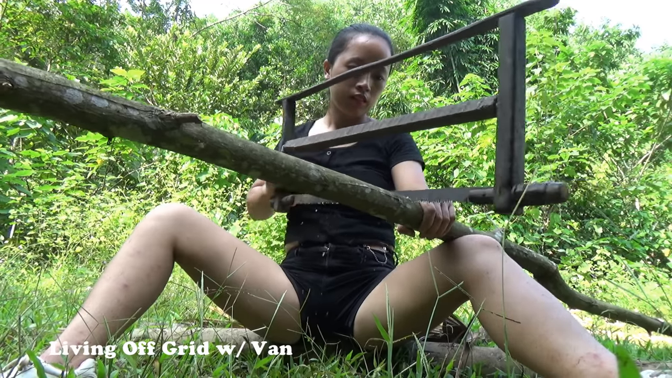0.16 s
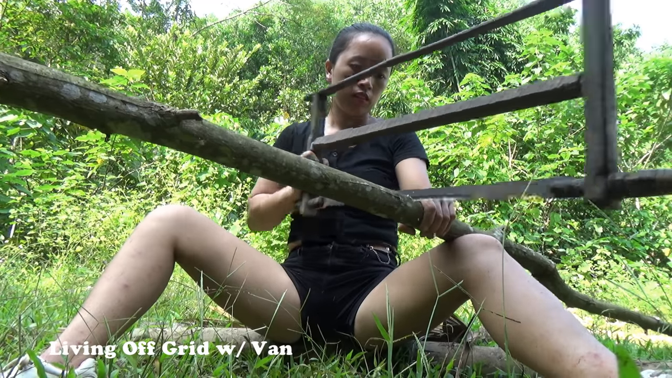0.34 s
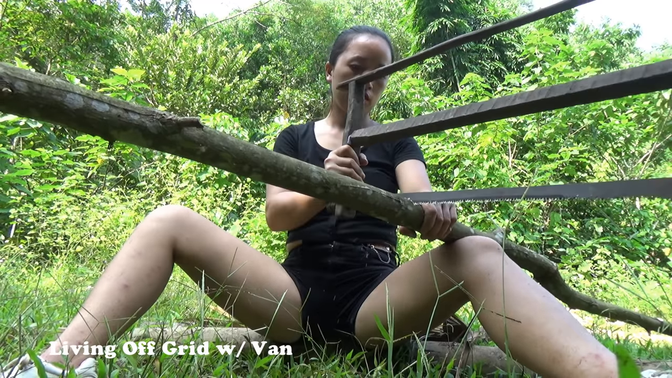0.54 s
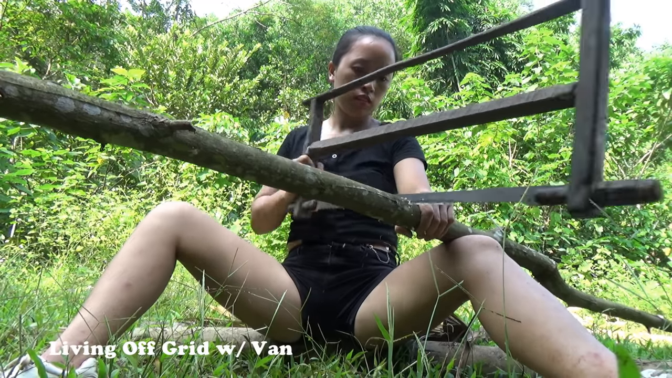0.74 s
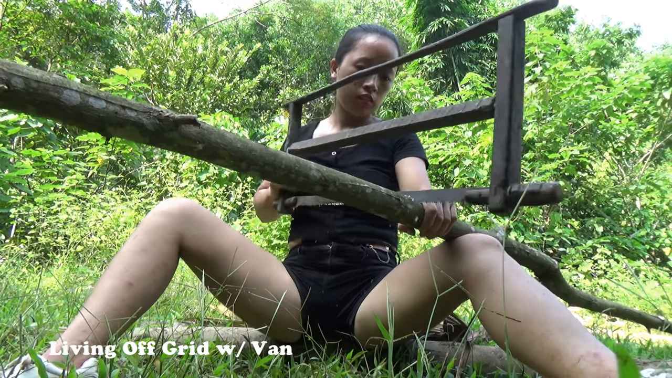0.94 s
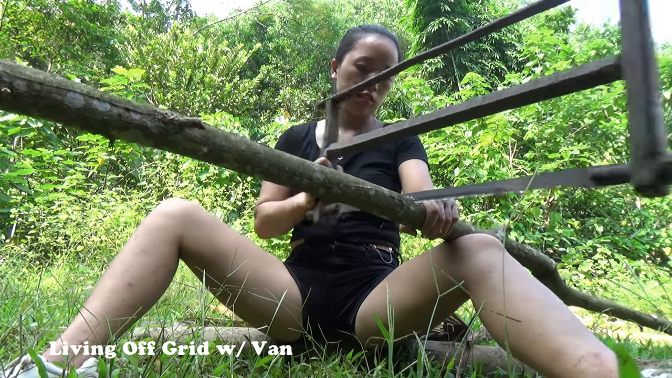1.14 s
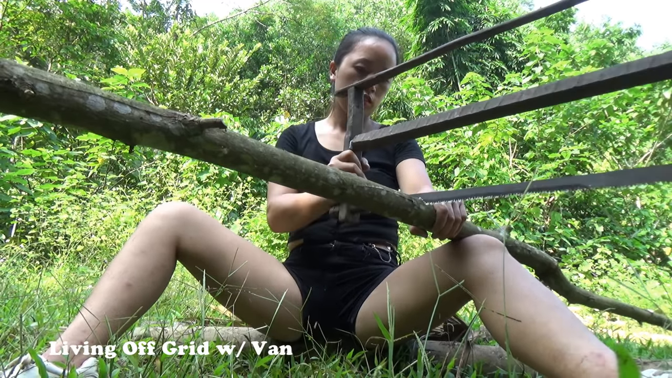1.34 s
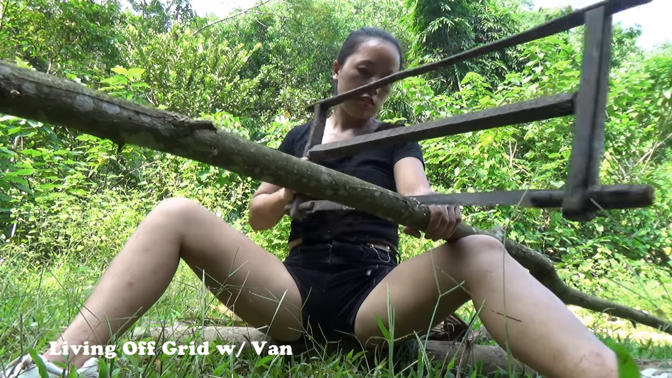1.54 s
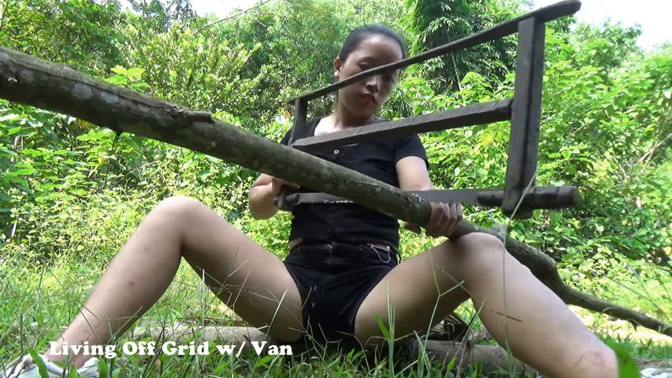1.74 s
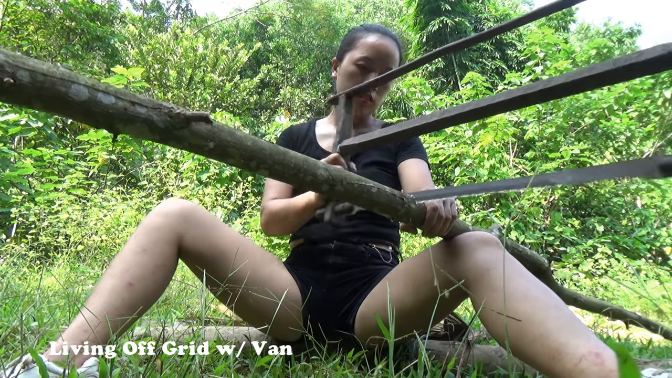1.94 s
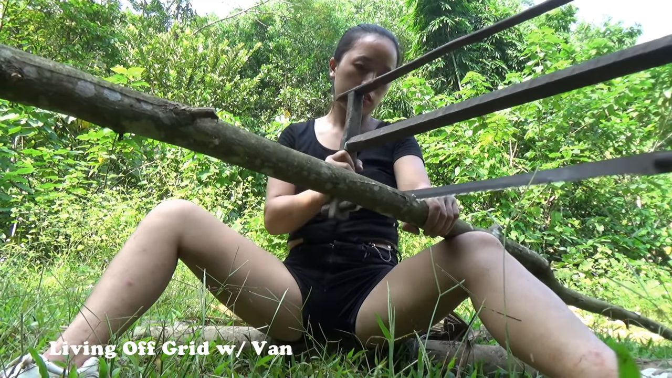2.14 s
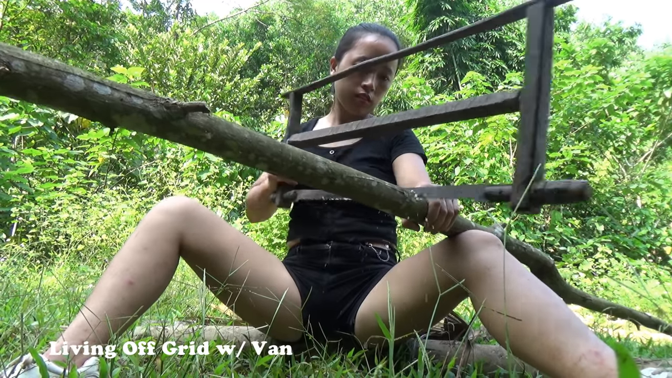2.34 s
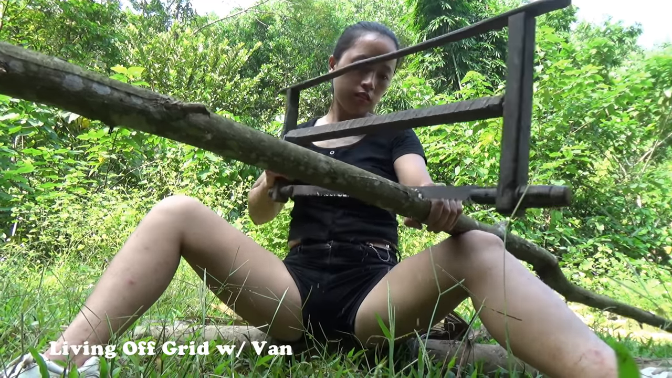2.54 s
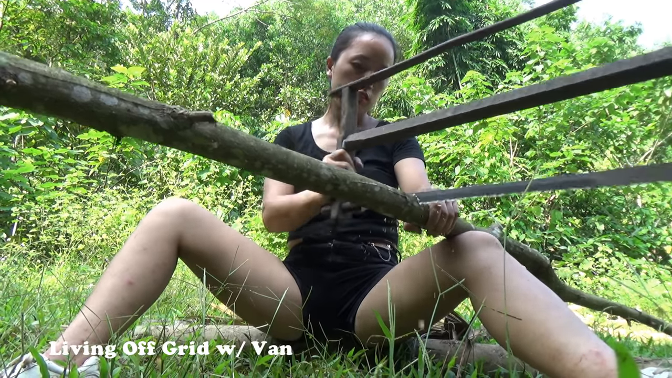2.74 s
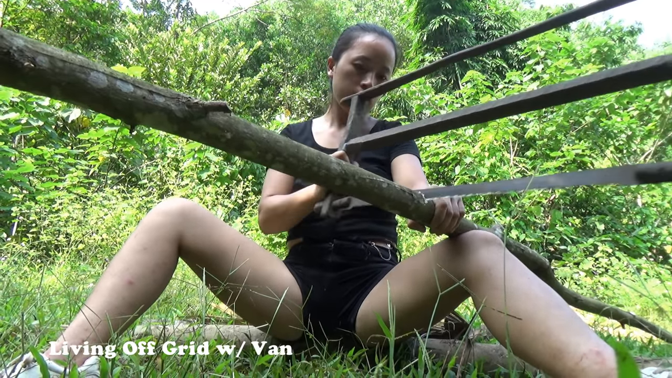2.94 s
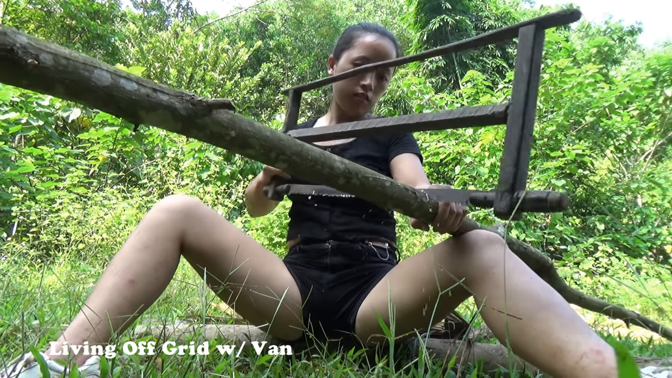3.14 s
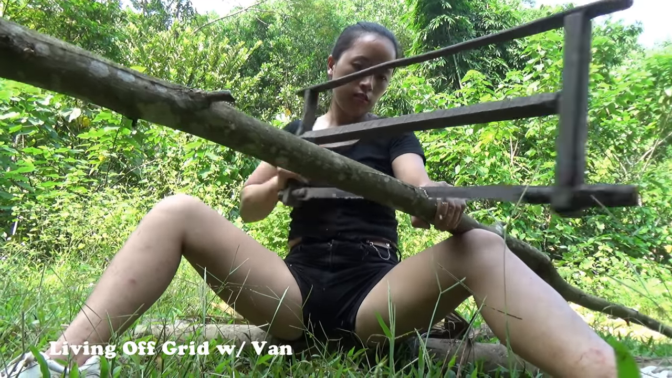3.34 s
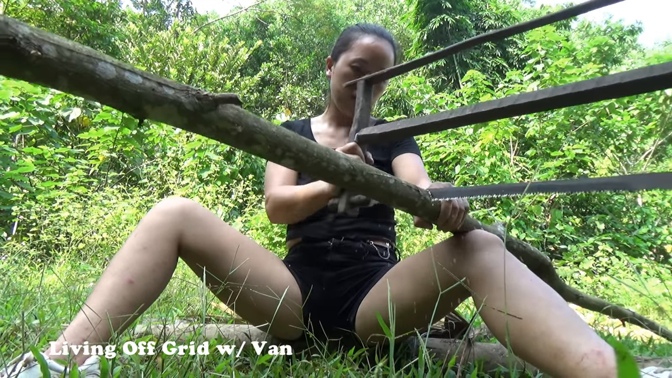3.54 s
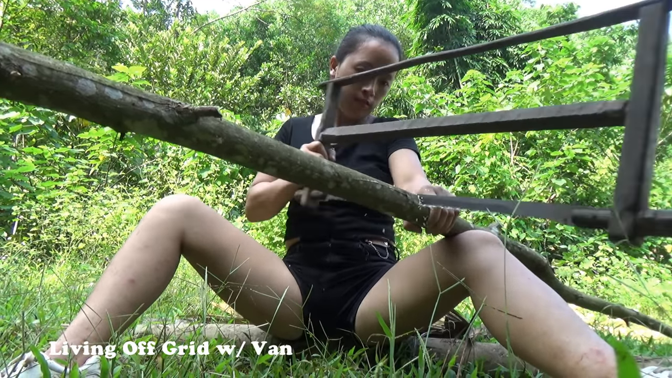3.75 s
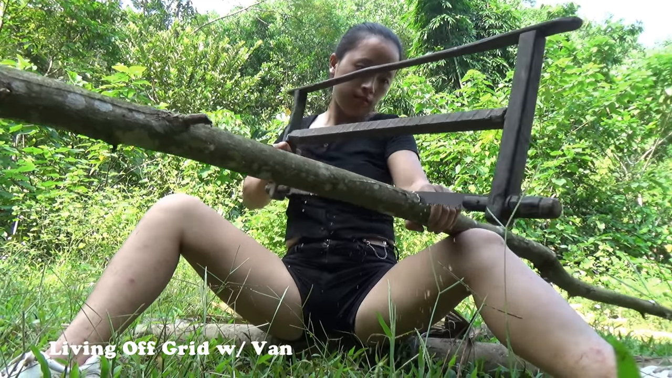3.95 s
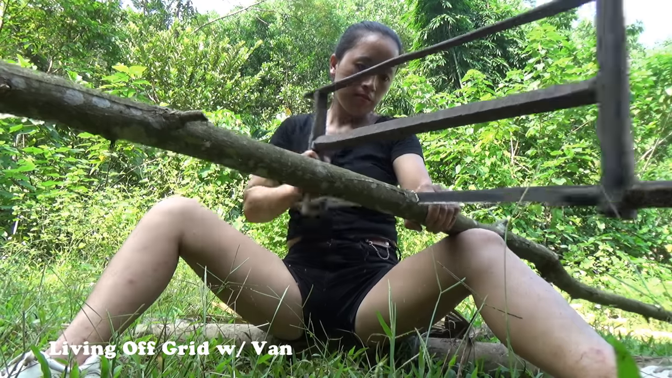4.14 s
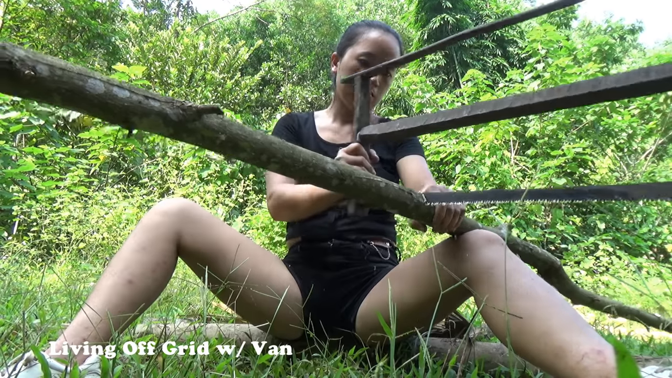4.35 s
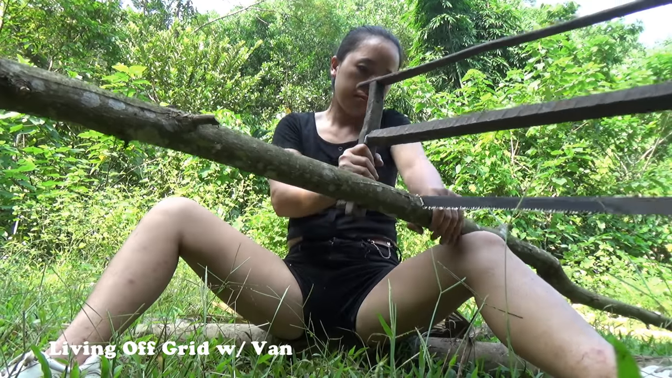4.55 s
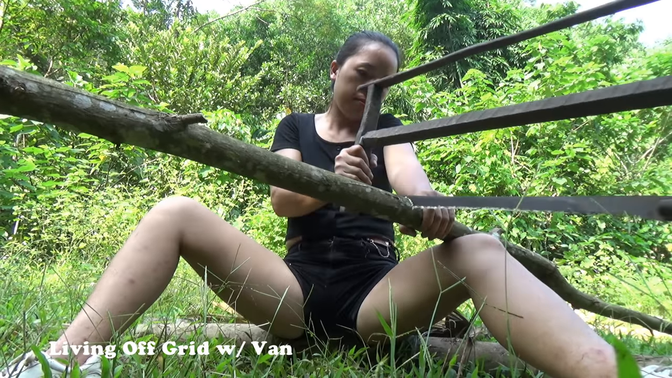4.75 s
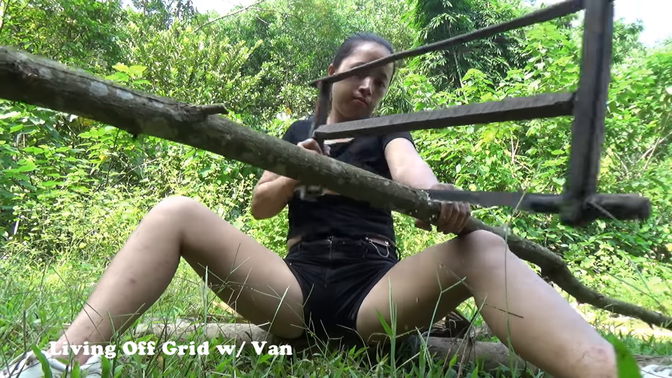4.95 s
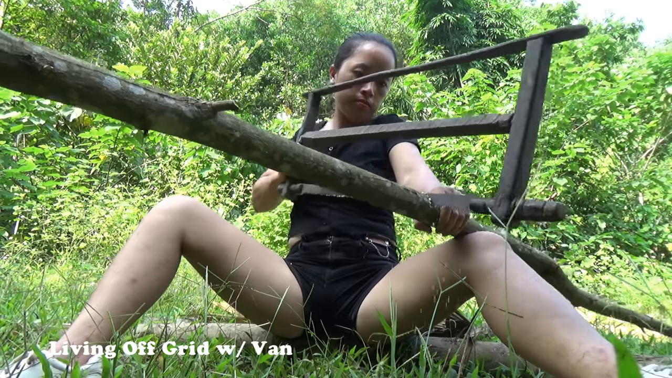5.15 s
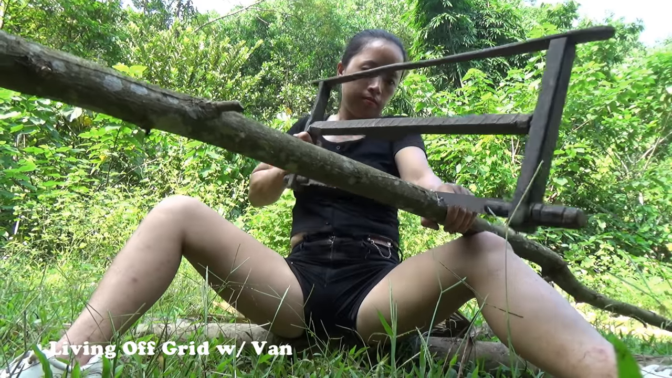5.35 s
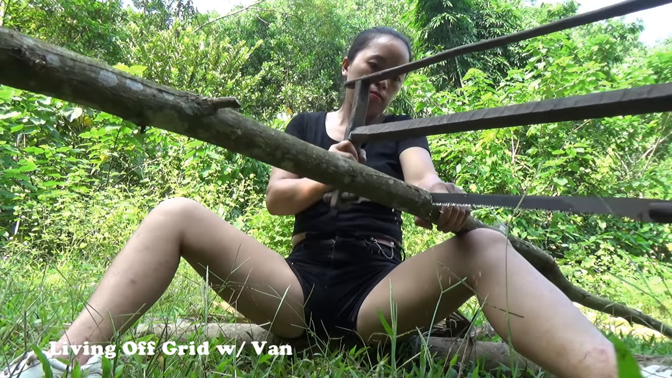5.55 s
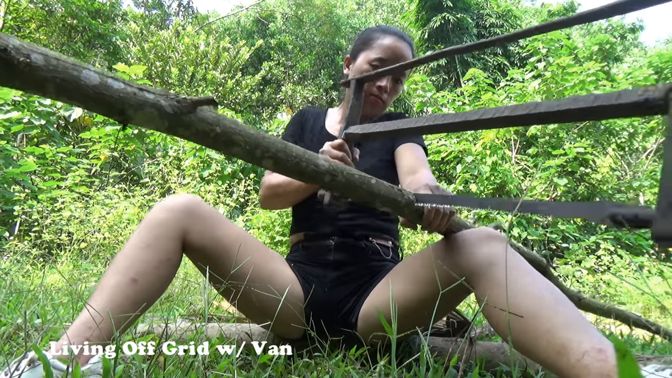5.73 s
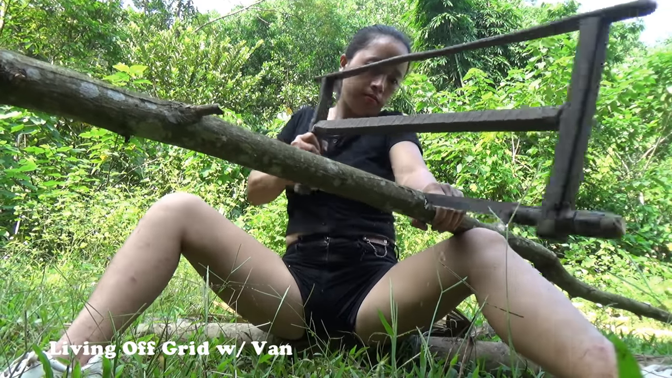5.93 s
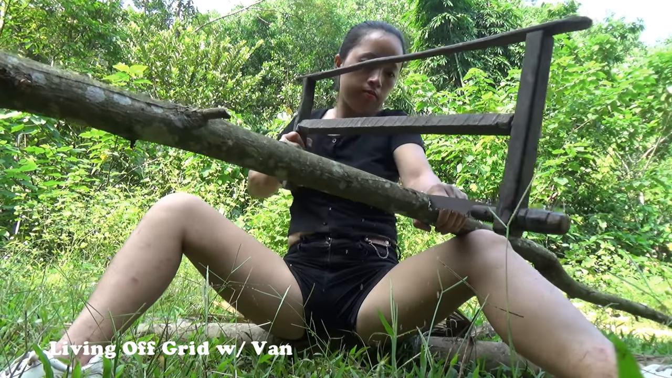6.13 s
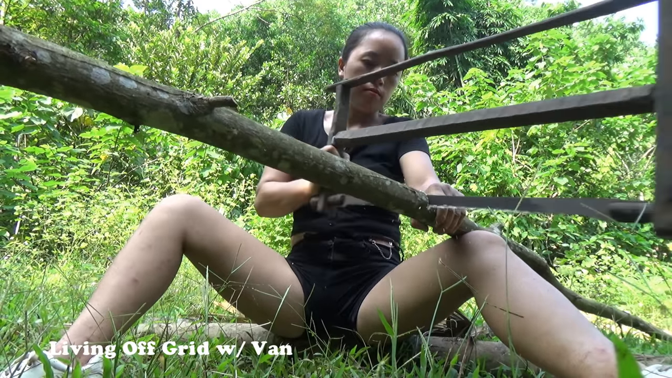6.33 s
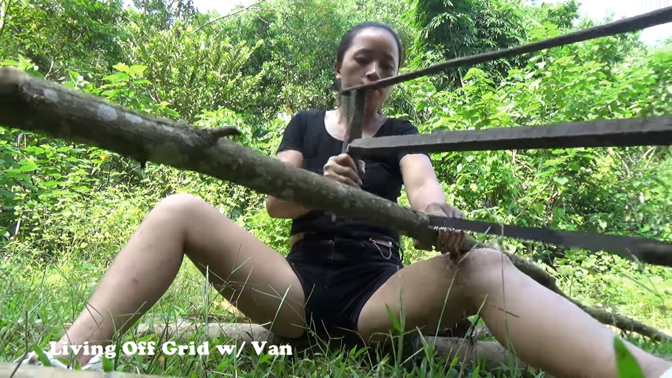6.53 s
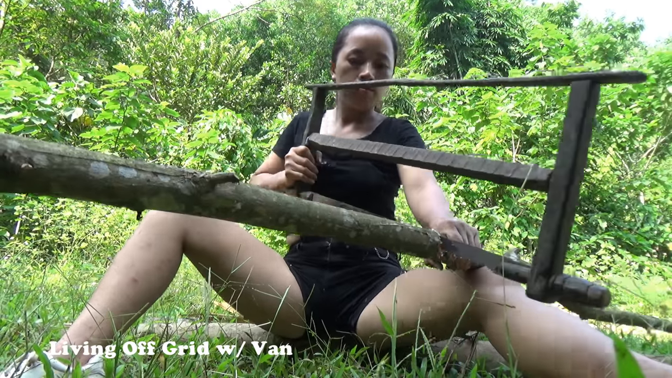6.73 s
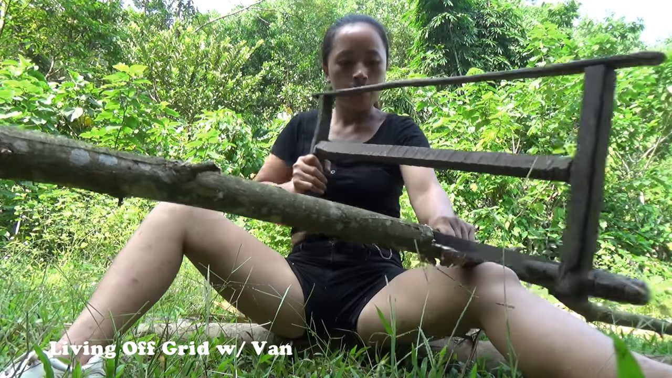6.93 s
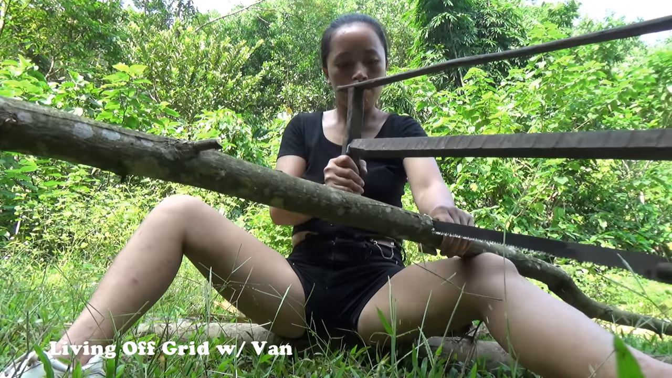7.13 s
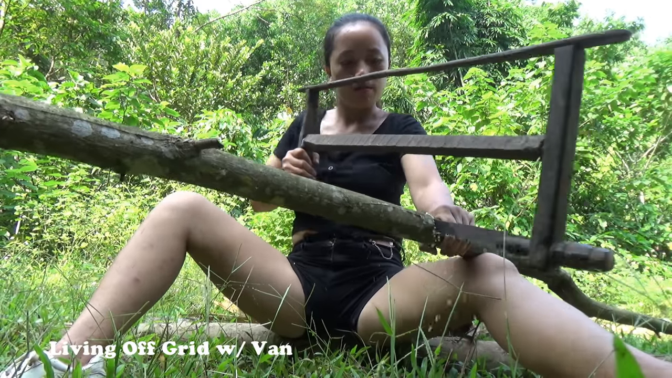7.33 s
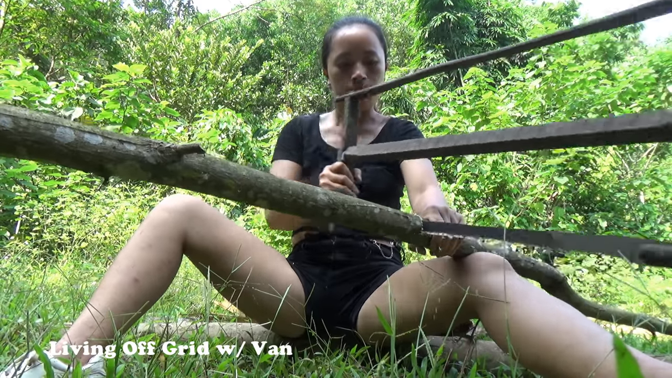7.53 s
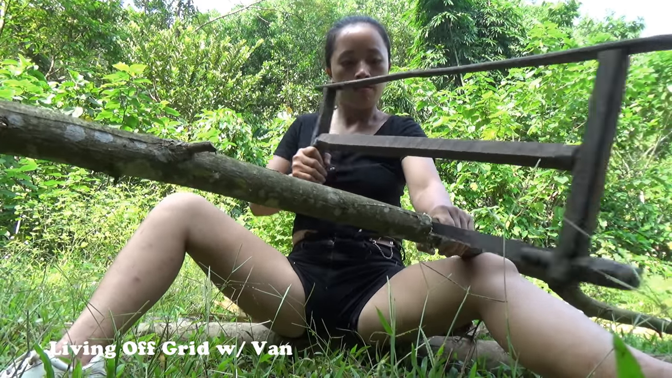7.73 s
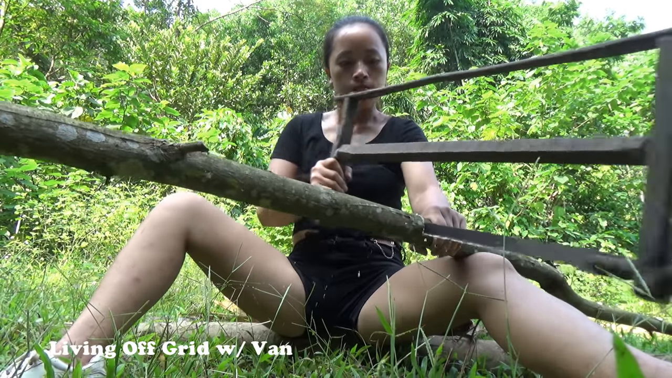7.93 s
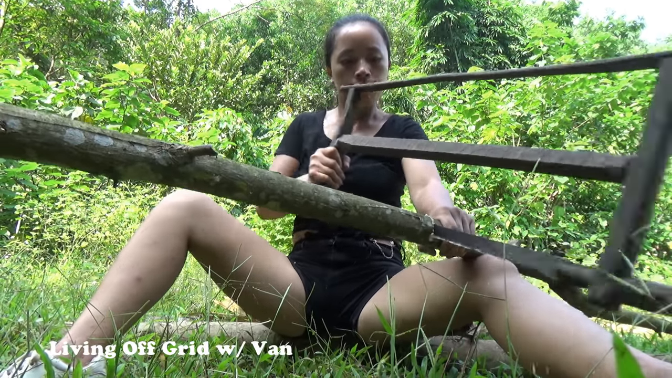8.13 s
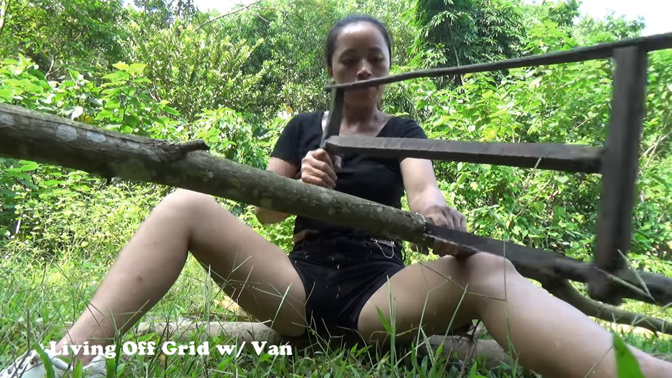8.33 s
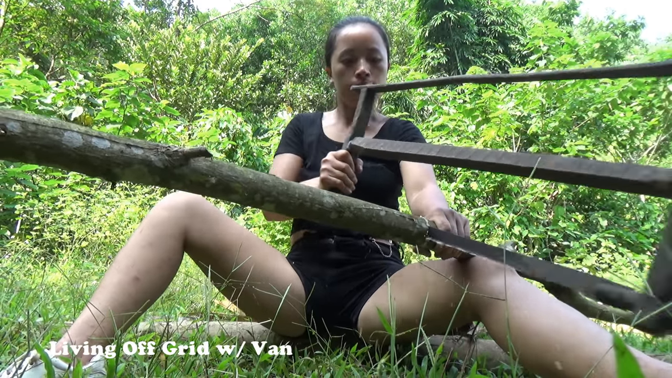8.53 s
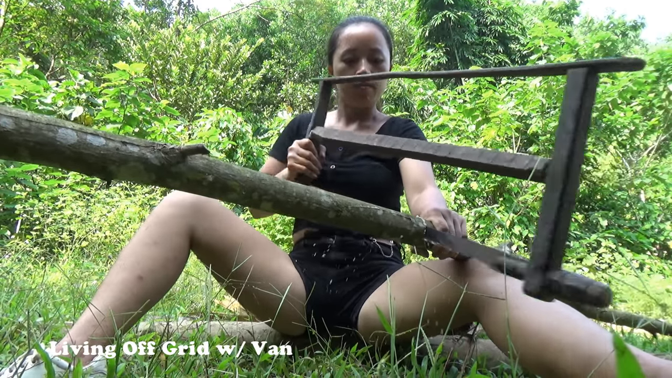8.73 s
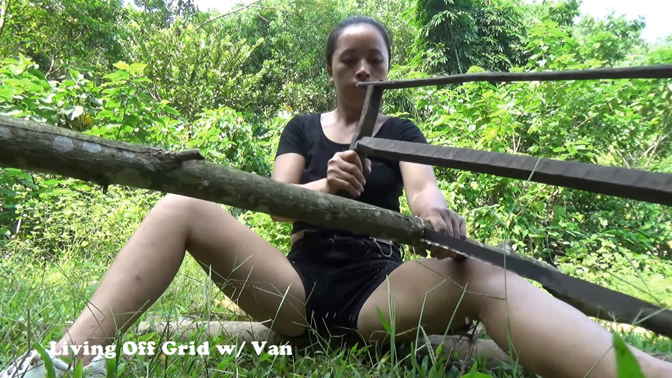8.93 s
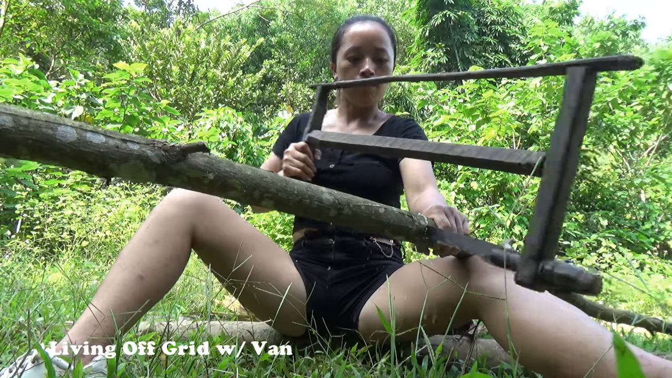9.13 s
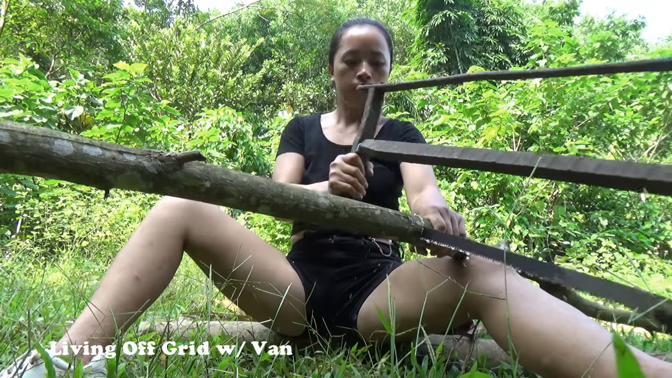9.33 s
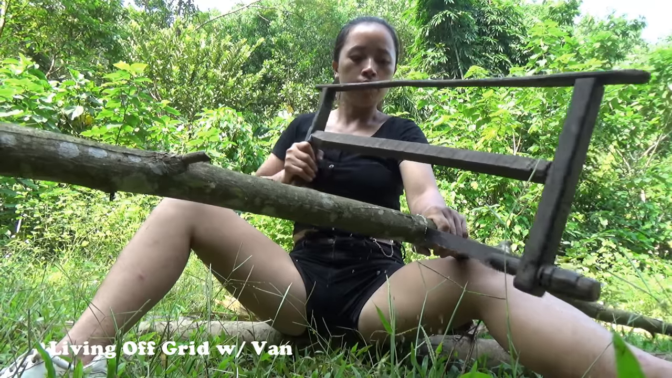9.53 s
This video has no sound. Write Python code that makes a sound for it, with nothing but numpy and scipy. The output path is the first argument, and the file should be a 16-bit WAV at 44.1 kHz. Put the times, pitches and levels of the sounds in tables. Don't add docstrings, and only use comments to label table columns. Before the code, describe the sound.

A frame saw rasps to and fro in fresh wood, first slow, then quicker, its blade clicking, while insects buzz faintly in a clearing.

```python
import sys
import numpy as np
from scipy import signal
from scipy.io import wavfile
from scipy.ndimage import uniform_filter1d

SR = 44100
rng = np.random.default_rng(int(sys.argv[2]) if len(sys.argv) > 2 else 0)


def ratio(d):
    e = np.asarray(d, float) / 20
    return 10 ** e


def dump_mix(stems):
    frames = np.atleast_2d(stems).T
    limited = np.clip(frames, -1, 1)
    pcm = np.round(limited * 32767).astype(np.int16)
    wavfile.write(sys.argv[1], SR, pcm)


N = 426888
CHANGE_S = 6.45


def read(points, hz):
    f, value = np.transpose(points)
    return np.interp(np.log(hz + 1), np.log(f + 1), value)


def evened(x):
    return x / np.sqrt(np.mean(x ** 2) + 1e-20)


def wander(per_s):
    b, a = signal.butter(2, per_s / SR * 2)
    return evened(signal.lfilter(b, a, rng.standard_normal(N)))


def colour(x, spectrum):
    hz = abs(np.fft.fftfreq(8192, 1 / SR))
    log_gain = np.log(ratio(np.maximum(read(spectrum, hz), -100)))
    phase = -signal.hilbert(log_gain).imag
    taps = np.fft.ifft(np.exp(log_gain + 1j * phase)).real[:2048]
    return signal.oaconvolve(x, taps)[:N]


def resonate(x, hz, width):
    b, a = signal.iirpeak(hz, hz / width, SR)
    return signal.lfilter(b, a, x)


def leaves():
    # f/Hz, density/dB per Hz
    leaf_spectrum = [(30, -20), (130, 0.5), (440, -2), (600, -6.5), (2000, -8), (6000, -14.5),
                     (10500, -12.5), (15500, -9.5)]
    # f/Hz, correlation [-1..1]
    likeness = [(30, 1), (250, 0.86), (1000, 0.99), (16000, 1)]
    frames, hz = N // 256 + 5, np.fft.rfftfreq(1024, 1 / SR)
    a, b, c, d, patches = rng.standard_normal((frames, 513, 5)).T
    patches = uniform_filter1d(patches, 12, 0)
    patches = evened(uniform_filter1d(patches, 14, 1))
    same = np.clip(read(likeness, hz), -1, 1)[:, None]
    left = a + 1j * b
    right = same * left + np.sqrt(1 - same ** 2) * (c + 1j * d)
    z = np.array([left, right]) * ratio(read(leaf_spectrum, hz)[:, None] + 2.2 * patches)
    hiss = signal.istft(z, nperseg=1024, noverlap=768)[1][:, :N]
    return ratio(-49.5) * evened(hiss)


def insects():
    # f/Hz, width/Hz, level/dB, pulses/per s, throbs/per s
    choirs = [
        (6980, 240, -54, 270, 6.6),
        (7180, 200, -54.5, 330, 7.5),
        (7600, 290, -66, 280, 12),
        (4800, 570, -57, 280, 32),
    ]
    t, out = np.arange(N) / SR, 0
    for hz, width, db, pulses, throbs in choirs:
        pulse_turns = np.cumsum(pulses * (1 + 0.077 * wander(8.8))) / SR
        throb_turns = np.cumsum(throbs * (1 + 0.178 * wander(1.75))) / SR
        pulse_db = 1.3 * np.cos(2 * np.pi * pulse_turns)
        throb_db = 2.2 * np.cos(2 * np.pi * throb_turns) + wander(40)
        noises = rng.standard_normal((2, N))
        middle, side = [evened(resonate(resonate(v, hz, width), hz, width * 2.0)) for v in noises]
        out = out + ratio(db + pulse_db + throb_db) * (middle + 0.18 * np.outer([1, -1], side))
    return out * ratio(-4 * np.clip((t - CHANGE_S) / .05, 0, 1))


def clearing(x):
    t = np.arange(4000) / SR
    tail = rng.standard_normal((2, len(t))) * ratio(-60 * t / 0.08) * (t > .001)
    tail = signal.lfilter([1], [1, -.3], tail)
    return signal.oaconvolve(x[None], tail / np.linalg.norm(tail[0]), axes=1)[:, :N]


def bumps():
    # t/s, peak/dB, f/Hz
    nudges = [
        (1.629, -44, 330),
        (4.834, -29.5, 224),
        (4.98, -27, 296),
        (5.0, -39, 115),
        (5.69, -41, 300),
        (6.018, -37, 224),
        (6.919, -44, 130),
        (9.571, -36, 200),
    ]
    out = np.zeros(N + SR)
    for s, db, hz in nudges:
        turns = np.arange(round(6 * SR / hz)) * hz / SR
        swell = turns * np.exp(1 - 1.18 * turns)
        out[round(s * SR):][:len(turns)] += ratio(db) * np.sin(2 * np.pi * turns) * swell
    return out[:N]


def shudder():
    # f/Hz, density/dB per Hz
    shake_spectrum = [(30, -20), (60, -10.5), (130, -1.5), (250, 0.5), (400, -5.5), (1000, -50)]
    shake = evened(colour(rng.standard_normal(N), shake_spectrum))
    bite_db = contact()[0]
    return shake * ratio(-42.5 + 0.34 * bite_db + 1.8 * wander(9))


def ticks():
    # t/s, peak/dB, ring f/Hz
    turning = [(0.0558, -3, 9800), (0.1102, -7, 9320), (0.9945, -17, 10200), (1.3365, -22, 7130),
               (1.379, -10, 7350), (1.773, -21, 9980), (2.075, -29, 8500), (2.1, -33, 10000),
               (2.468, -25, 3000), (2.8503, -18, 7070), (2.875, -32, 11000), (2.8943, -28, 3230),
               (3.2964, -16, 9260), (3.6661, -29, 3110), (4.7516, -12, 9710), (4.8673, -6, 11800),
               (5.3667, -17, 9500), (5.7932, -21, 9410), (6.133, -31, 7210), (6.2118, -25, 10300),
               (6.478, -33, 3050), (6.5857, -13, 3960), (6.806, -4.5, 4200), (7.635, -18, 9190),
               (8.3027, -27, 9170), (8.4906, -15, 9450), (9.558, -12, 9100)]
    # t/s, peak/dB, ring f/Hz
    rattling = [(3.5634, -16, 7050), (3.5718, -12, 9150), (3.5774, -23, 9120), (3.5897, -18, 3300),
                (4.58, -25, 7000), (4.5954, -28, 2400), (4.6117, -24, 8200), (4.6409, -31, 10500),
                (4.652, -37, 10500), (4.663, -19, 10000), (4.675, -38, 10500), (4.6894, -29, 10300),
                (4.697, -34, 10300), (4.7044, -29, 10300), (4.72, -27, 11000), (9.3455, -19, 8000),
                (9.3512, -0.5, 7600), (9.356, -5, 11000), (9.361, -3, 11000), (9.3678, -4, 9420)]
    events = [*turning, *rattling]
    out, t = np.zeros(N + SR), np.arange(900) / SR
    grit = rng.standard_normal((len(events), len(t)))
    grit[:, 0] = 5
    for (s, db, hz), noise in zip(events, grit):
        crack = noise * ratio(-60 * t / 0.004)
        steel = resonate(noise * ratio(-60 * t / 0.008), hz, 2200) * ratio(-3.5)
        knock = resonate(noise * ratio(-60 * t / 0.044), 2500, 1900) * ratio(-25.5 + (0.3 - 1) * db)
        tick = np.diff(crack, prepend=0) * ratio(-15.0) + steel
        out[round(s * SR):][:len(t)] += ratio(db) * (tick / abs(tick).max() + knock)
    return out[:N]


def stroke(t, start, full, stop, db, stopping, law):
    speed_db, slow_db, fade_db = law
    level = db + speed_db * np.log10(np.clip((t - start) / (full - start), 1e-5, 1))
    level = level + slow_db * np.clip((t - full) / max(stop - full, 1e-3), 0, 1) ** 2
    halt = -32 * np.maximum(t - stop, 0) / stopping
    fade = fade_db * (.5 - np.clip((t - start) / (stop - start), 0, 1))
    return level + halt, level + 1.34 * halt + fade


def contact():
    # start t/s, full speed t/s, stop t/s, bite/dB, stopping time/s
    pushes = [(0.184, 0.414, 0.479, -20.2, 0.049), (0.971, 1.149, 1.233, -19.4, 0.086),
              (1.747, 1.906, 1.992, -18.1, 0.042), (2.526, 2.645, 2.755, -17.6, 0.055),
              (3.271, 3.396, 3.505, -16.6, 0.032), (4.011, 4.165, 4.261, -18.3, 0.049),
              (5.333, 5.442, 5.531, -17.7, 0.032), (6.194, 6.314, 6.404, -18.1, 0.041),
              (6.868, 7.01, 7.09, -18.0, 0.03), (7.39, 7.499, 7.566, -18.2, 0.04),
              (7.842, 7.934, 8.014, -18.4, 0.033), (8.282, 8.367, 8.445, -18.9, 0.051),
              (8.708, 8.796, 8.9, -20.4, 0.029), (9.144, 9.216, 9.32, -19.3, 0.037),
              (9.537, 9.64, 9.766, -19.6, 0.04)]
    # start t/s, full speed t/s, stop t/s, bite/dB, stopping time/s
    pulls = [(-0.128, -0.058, 0.123, -25.0, 0.03), (0.574, 0.766, 0.9, -23.0, 0.041),
             (1.364, 1.48, 1.682, -25.6, 0.036), (2.115, 2.245, 2.423, -22.5, 0.038),
             (2.883, 3.042, 3.186, -20.1, 0.032), (3.654, 3.738, 3.941, -23.3, 0.032),
             (4.742, 4.847, 4.855, -20.5, 0.026), (4.844, 4.938, 5.104, -26.2, 0.035),
             (5.781, 5.847, 5.874, -19.8, 0.053), (5.855, 5.984, 6.081, -25.5, 0.031),
             (6.568, 6.614, 6.807, -22.5, 0.059), (7.149, 7.222, 7.359, -24.3, 0.027),
             (7.612, 7.741, 7.807, -21.2, 0.047), (8.049, 8.194, 8.242, -22.3, 0.032),
             (8.478, 8.612, 8.686, -20.5, 0.046), (8.918, 8.986, 9.122, -22.9, 0.036),
             (9.358, 9.481, 9.526, -19.4, 0.05)]
    # start t/s, stop t/s, bite/dB, rasp relative to bite/dB
    drags = [
        (0.54, 0.609, -46, 3),
        (2.035, 2.1, -52, 5),
        (2.82, 2.88, -54, 5),
        (3.564, 3.596, -41, -4),
        (4.582, 4.736, -53.5, 5.5),
        (5.596, 5.621, -47, -1),
        (6.425, 6.582, -35, -10.5),
        (9.35, 9.364, -30, -2),
    ]
    # t/s, rasp relative to bite/dB
    freedom = [(0.0, 4), (1.5, 2.3), (3.0, -0.2), (4.2, 1.5), (5.5, 0.5), (6.4, -0.2), (7.0, -0.6),
               (8.0, 0.5), (9.0, 0.9), (9.7, -0.5)]
    # t/s, change/dB, width/s
    jolts = [(0.351, 3.5, 0.029), (0.61, 8, 0.0054), (0.681, 6.1, 0.015), (1.099, 3.5, 0.0094),
             (1.382, 7, 0.0042), (1.575, 9.5, 0.011), (1.627, 8.5, 0.0068), (2.32, 5.5, 0.014),
             (3.007, 4.1, 0.0089), (3.091, 4, 0.006), (3.762, 4, 0.014), (3.866, 7.5, 0.011),
             (4.757, 6, 0.0089), (4.868, -4, 0.0034), (4.996, 12, 0.0055), (6.483, 9.5, 0.0075),
             (6.772, 7, 0.007), (7.345, 4, 0.0081), (8.116, 6.5, 0.014), (8.499, 6.5, 0.009),
             (8.563, 2.5, 0.0077), (9.086, 7, 0.017), (9.413, 6.5, 0.02),
             (0.043, -13, 0.0031), (0.095, -9, 0.0098), (0.279, -3.0, 0.027), (0.721, -4.5, 0.012),
             (0.788, -12.5, 0.0044), (1.027, -5, 0.007), (1.524, -3, 0.0059), (2.27, -5.5, 0.015),
             (3.047, -7.5, 0.014), (3.118, -3.7, 0.0064), (3.799, -4.3, 0.013), (3.896, -6, 0.0051),
             (4.875, -13, 0.0035), (5.021, -6, 0.0046), (5.527, -2, 0.005), (6.02, -6.5, 0.01),
             (6.556, -7.3, 0.025), (6.796, -8, 0.013), (8.589, -3.7, 0.0071), (9.207, -3.5, 0.011),
             (9.471, -2.5, 0.0049)]
    push_law, pull_law = (34, -2.36, 3.9), (20.3, -10, 2.5)
    t = np.arange(0, N / SR + .002, .001)
    free_db = np.interp(t, *np.transpose(freedom))
    power = np.full((2, len(t)), 1e-9)
    for rows, law in ((pushes, push_law), (pulls, pull_law)):
        for row in rows:
            power += ratio(np.array(stroke(t, *row, law)) + np.outer([0, 1], free_db)) ** 2
    for start, stop, db, rasp_db in drags:
        outside_s = np.maximum(np.maximum(start - t, t - stop), 0)
        power += ratio(db - 2000 * outside_s + np.array([[0], [rasp_db]])) ** 2
    jolt_db = 0
    for at, db, width in jolts:
        jolt_db = jolt_db + db * np.exp(-((t - at) / width) ** 2 / 2)
    bite_db, rasp_db = 10 * np.log10(uniform_filter1d(power, size=3)) + jolt_db
    return [np.interp(np.arange(N) / SR, t, v) for v in (bite_db - 1.6, rasp_db - 2.13)]


def snaps(per_s, spread_db):
    size = ratio(spread_db * np.minimum(rng.exponential(1, N), 5)) * rng.choice([-1., 1.], N)
    return evened(size * (rng.random(N) < per_s / SR))


def ring(x, modes, sway_db):
    t, out = np.arange(0, N / SR, .02), 0
    chances = rng.random((len(modes), 2, 4))
    for (hz, width, db), (rate, phase) in zip(modes, chances):
        turns = np.outer(t, .4 + 7 * rate) + phase
        sway = np.sin(2 * np.pi * turns).sum(1) / np.sqrt(2)
        gain = np.interp(np.arange(N) / SR, t, ratio(db + sway_db * np.minimum(sway, 1)))
        out = out + resonate(x * gain, hz, max(width, 55))
    return out


def patchy(x, db, bins, frames):
    z = signal.stft(x, nperseg=256, noverlap=192)[2]
    field = rng.standard_normal(z.shape)
    field = uniform_filter1d(field, round(bins), 0)
    field = uniform_filter1d(field, round(frames), 1)
    return signal.istft(z * ratio(db * evened(field)), nperseg=256, noverlap=192)[1][:N]


def saw():
    # f/Hz, density/dB per Hz
    wood_spectrum = [(35, -54), (60, -41), (278, -19.5), (448, -6.5), (547, -13), (1370, -5.5), (2080, -7),
                     (2590, -5), (2800, -7.5), (3090, -4), (7000, -19), (9100, -19), (15400, -120)]
    # f/Hz, density/dB per Hz
    blade_spectrum = [(2940, -30), (5000, -11.5), (6400, -8), (9520, 2), (13600, -3), (15600, -6)]
    # f/Hz, width/Hz, level/dB
    earlier_modes = [(430, 16, -14), (627, 16.7, 1.5), (770, 35, -7), (1142, 37, -5), (1340, 30, -29),
                     (1605, 27, -5), (1920, 68, -4), (2210, 41, -8.5), (2555, 145, -2.5), (3014, 78, -7.5),
                     (3990, 370, -8)]
    # f/Hz, width/Hz, level/dB
    later_modes = [(330, 23, -9.5), (622, 39, 5.5), (817, 106, -2.5), (1151, 35, -1.5), (1530, 38, -13),
                   (1714, 43, 0), (1841, 26, -0.5), (2233, 41, 2), (2505, 44, 0), (3116, 23, -7),
                   (3720, 48, -8), (4040, 160, -8)]
    # f/Hz, width/Hz, level/dB
    steel_modes = [(8800, 82, -26), (9500, 470, -4.5), (11800, 51, -38), (13900, 650, -7)]
    t = np.arange(N) / SR
    bite_db, rasp_db = contact()
    chatter_db = 1.1 * wander(60) + 0.65 * wander(310)
    tear = snaps(9000, 1.45)
    second = np.clip((t - CHANGE_S) / 0.025, 0, 1)

    wood = colour(tear * ratio(bite_db + chatter_db), wood_spectrum) / np.std(colour(tear, wood_spectrum))
    modes = ring(wood * (1 - second), earlier_modes, 4.0) + ring(wood * second, later_modes, 2.4)
    wood = wood + ratio(2.0) * modes

    blade = tear + ratio(-12) * snaps(240, 1.2)
    blade = colour(blade * ratio(rasp_db + chatter_db), blade_spectrum) / np.std(colour(tear, blade_spectrum))
    blade = blade + ratio(-5) * resonate(blade * second, 13800, 2700)
    blade = blade + ratio(-6.5) * ring(blade, steel_modes, 2.2)
    return patchy(ratio(-3.0) * wood + ratio(-0.63) * blade, 1.58, 6, 14.8)


def scene():
    tool = saw() + ticks() + bumps() + shudder()
    return tool + ratio(-25.5) * clearing(tool) + leaves() + insects()


def top_cut(x):
    return signal.sosfilt(signal.butter(12, 16880, fs=SR, output="sos"), x)


def record(dry):
    edge = signal.firwin(601, 15780, window=("kaiser", 9), fs=SR)
    mix = signal.oaconvolve(dry, edge[None], "same", axes=1)
    return top_cut(mix)


dry = scene()
out = record(dry)
dump_mix(out)
```